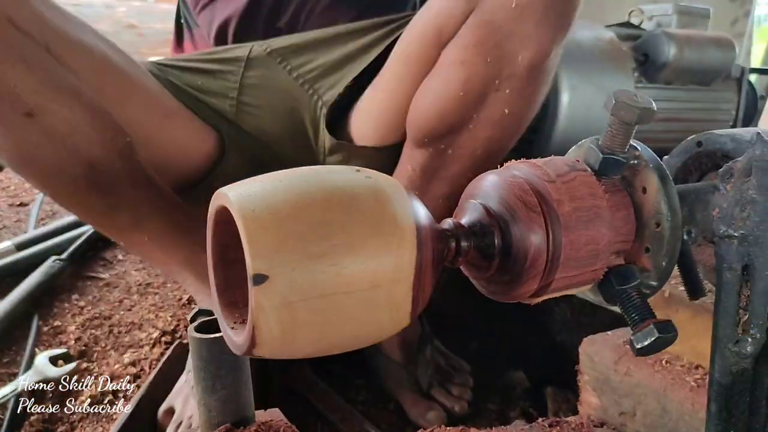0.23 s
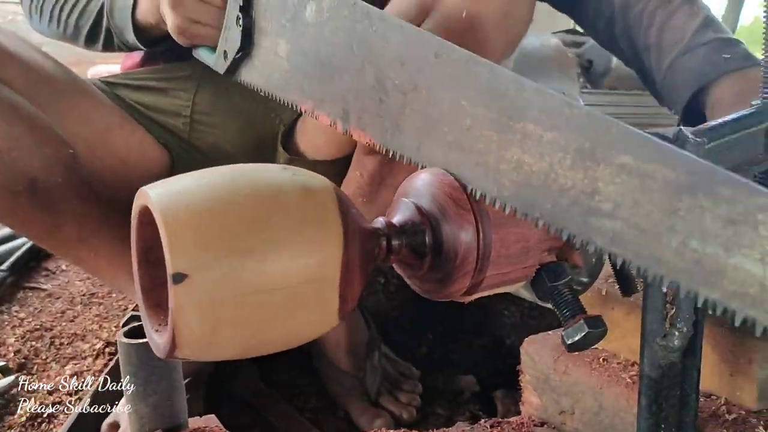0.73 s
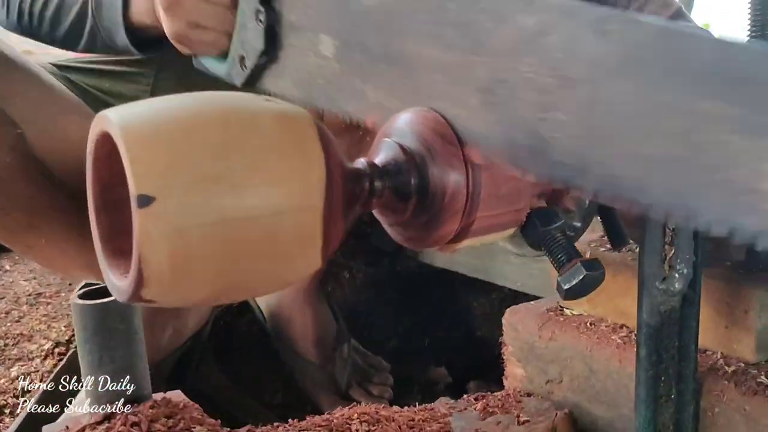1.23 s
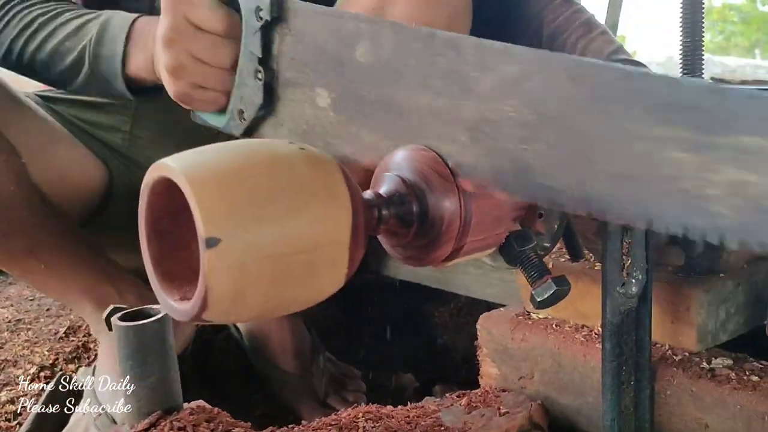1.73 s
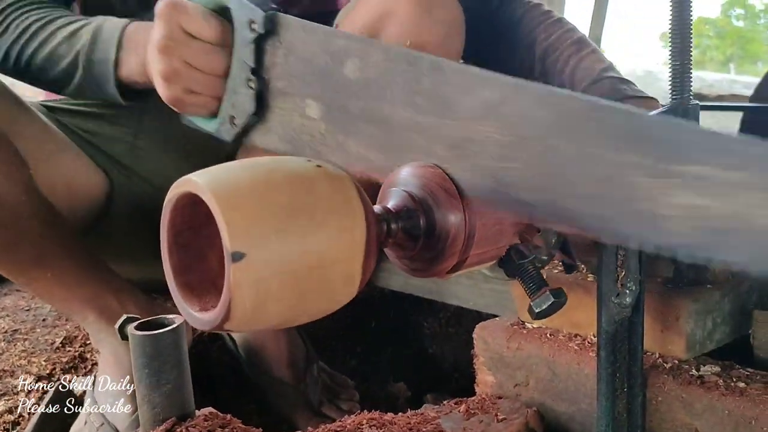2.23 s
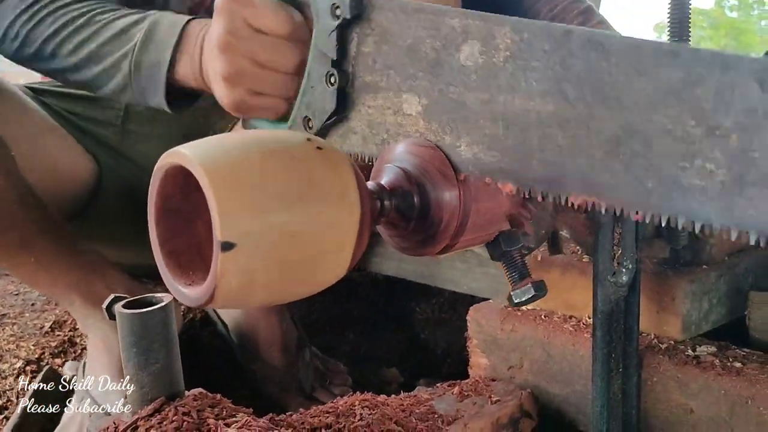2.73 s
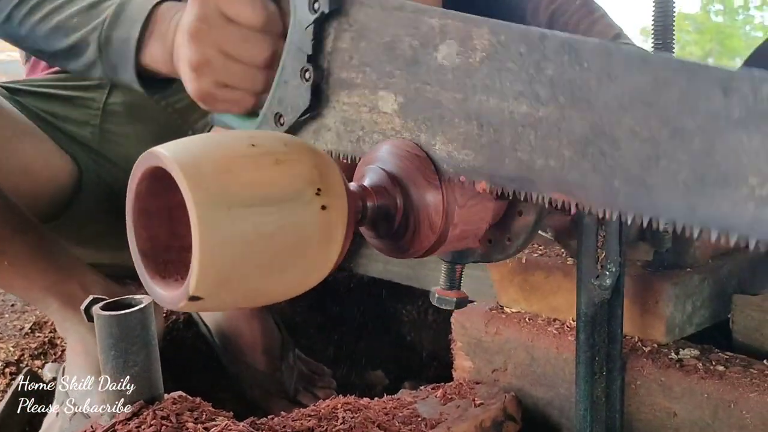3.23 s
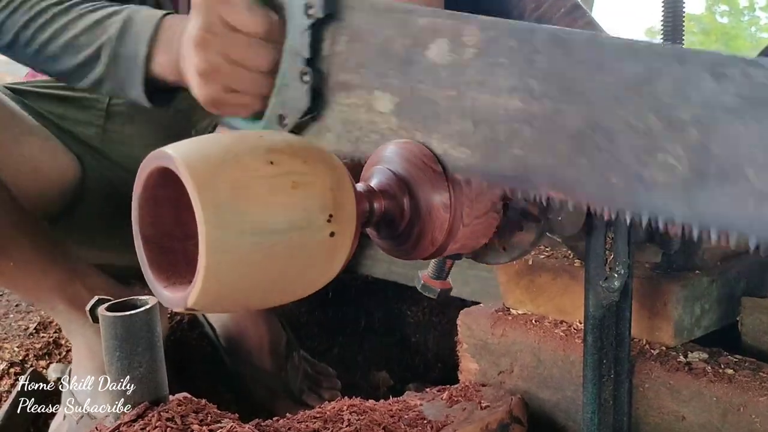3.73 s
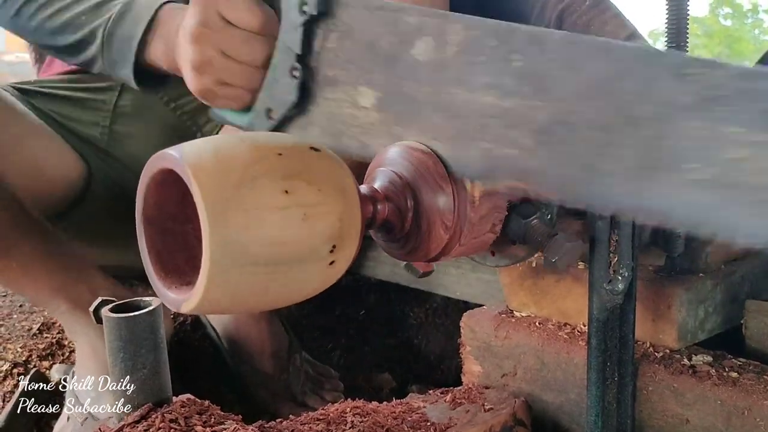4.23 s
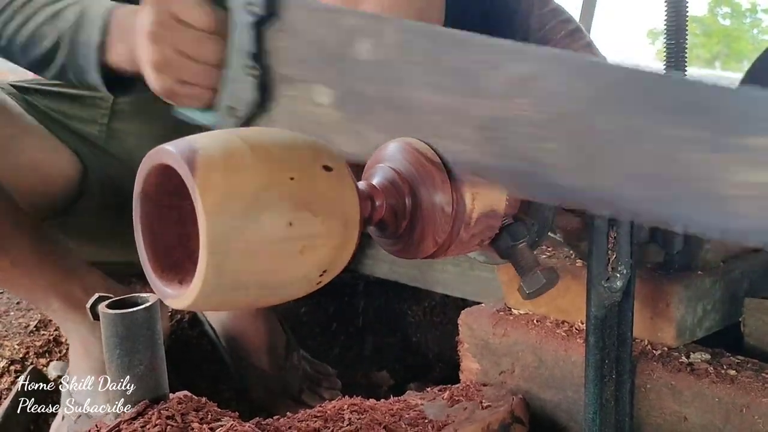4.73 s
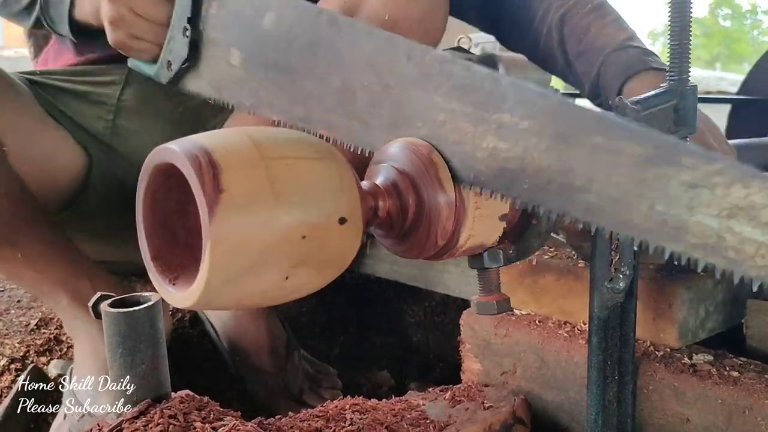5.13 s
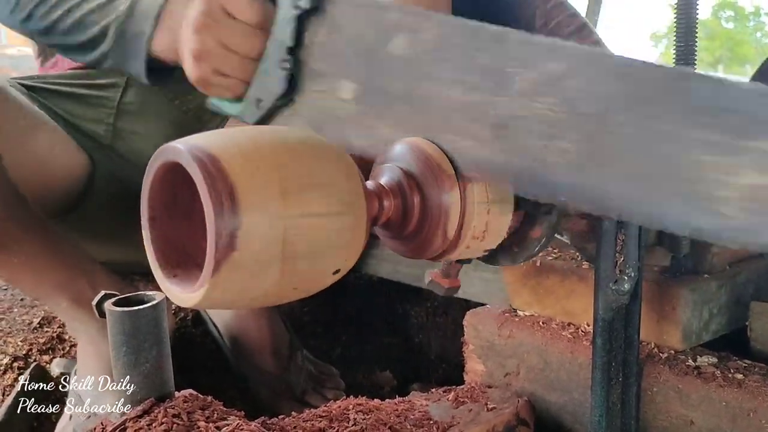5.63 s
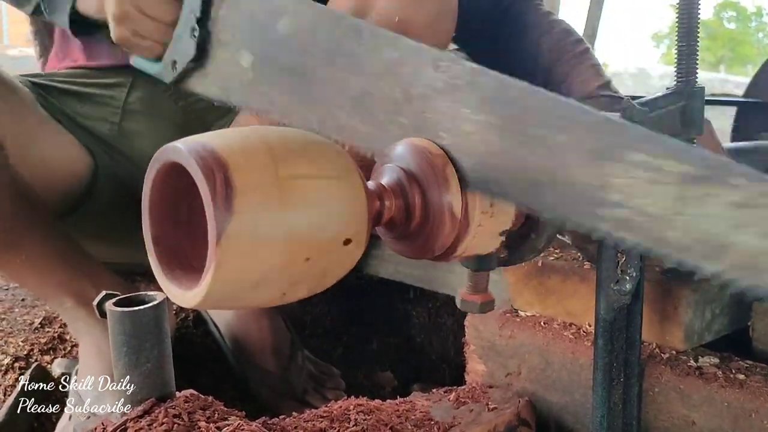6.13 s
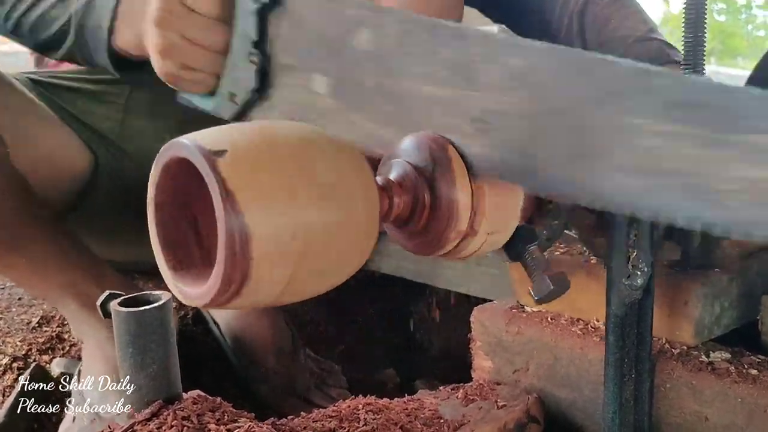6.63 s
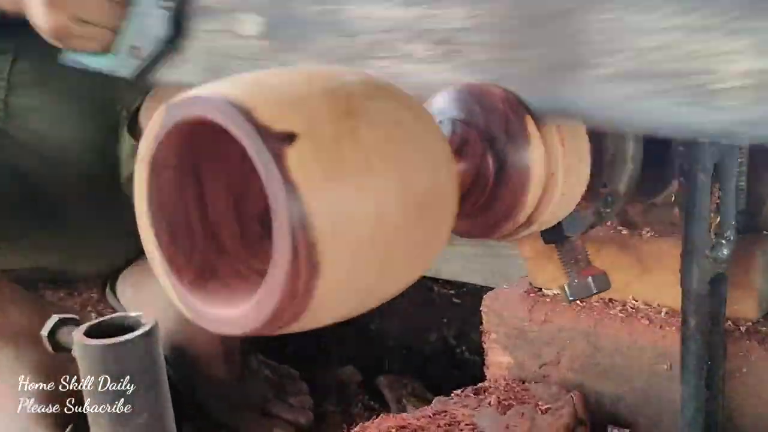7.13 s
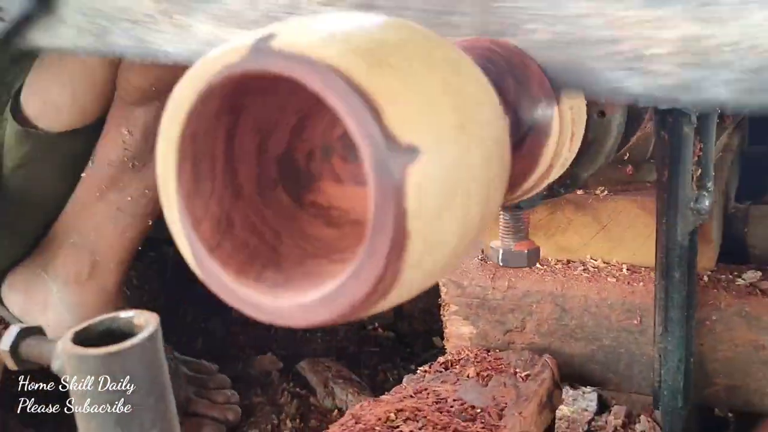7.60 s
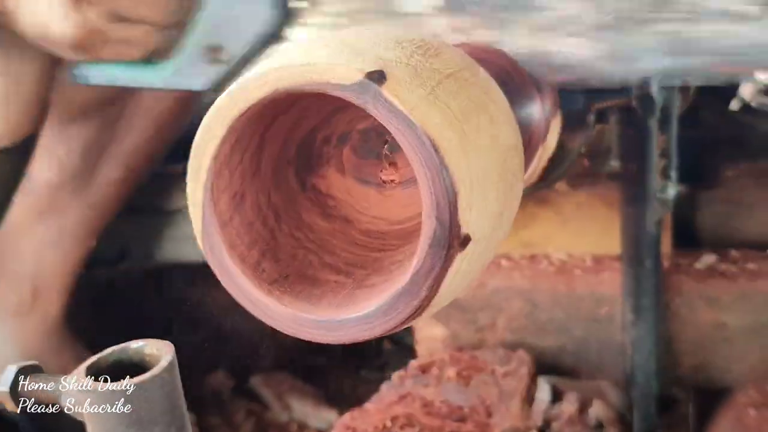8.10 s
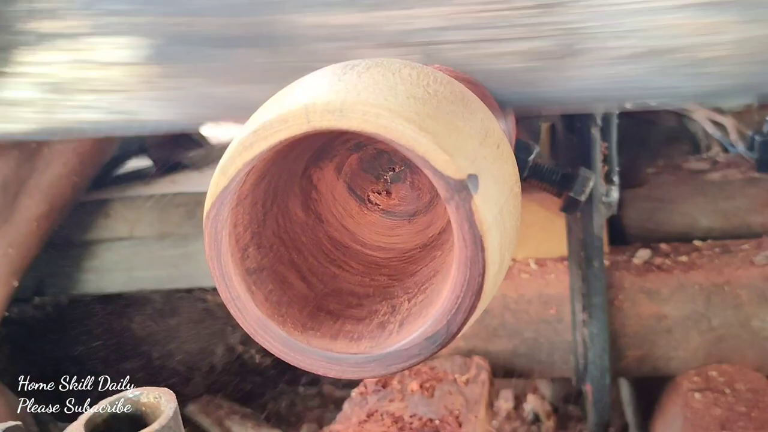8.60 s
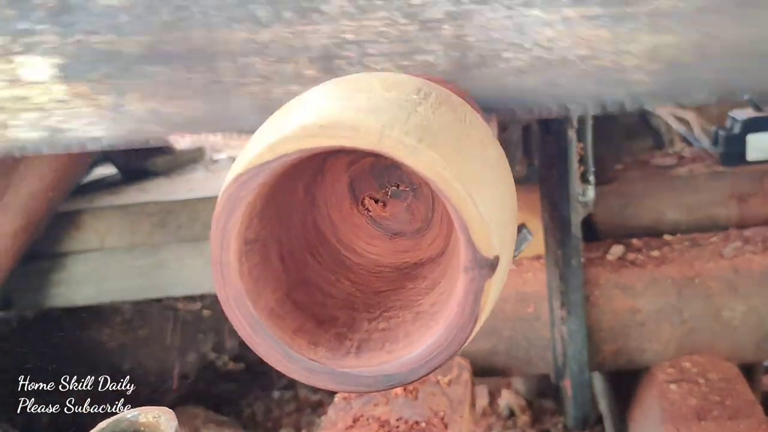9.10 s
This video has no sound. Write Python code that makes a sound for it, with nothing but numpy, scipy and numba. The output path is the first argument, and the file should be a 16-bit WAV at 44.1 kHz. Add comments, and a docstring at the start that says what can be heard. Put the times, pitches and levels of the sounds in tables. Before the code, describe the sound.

A quiet open shed with very faint air and a short, weak echo. From 0.2 s saw teeth barely scrape; by 0.7 s a hand saw rasps quickly back and forth, about eight strokes a second, gritty and bright with a hollow woody ring around 800-900 Hz. A short soft hoot near 1 kHz comes at 1.1 s. Blunt knocks fall at 2.0, 2.7, 3.3-3.4, 3.9 and 5.0 s, with brief rests near 2.8, 4.0, 5.1 and 6.3 s. Between 3.8 and 7 s tiny squeaks, mostly rising, chirp around 2-3 kHz. From 6.2 s the microphone moves closer and the rasp grows louder and changes colour. From 7 to 8.5 s low dust pops strike the left channel, which turns muffled. A strong knock lands at 7.45 s. Sawing halts at 8.75 s with a faint steel ring, then resumes for a few uneven strokes and a falling squeal at 9.3 s.

```python
"""Hand saw on a turned wooden cup

A hand saw cuts a turned wooden cup off its stub on a stopped lathe, in quick strokes with short rests, in an
open shed. Noise bursts of the teeth, shaped by speed and pressure, make the rasp and excite modes of cup and blade.
Stick-slip squeals are gliding tones; knocks, a blade ring and two hoots join them, with a faint echo and air.
Late on the phone moves in front of the cup and the rasp changes colour; sawdust pops against its left microphone
port and clogs it, a moving low-pass filter, so that side goes dull."""
import sys
import numpy as np
from scipy import signal
from scipy.fft import rfft, irfft
from scipy.io import wavfile
from scipy.ndimage import uniform_filter1d
from numba import njit

SR = 44100
rng = np.random.default_rng(int(sys.argv[2]) if len(sys.argv) > 2 else 0)


def waveform_to_disk(signal):
    """Save audio, clipped to [-1, 1], as 16-bit WAV at the path in sys.argv[1]."""
    frames = np.transpose(np.atleast_2d(signal))
    scaled = np.clip(frames, -1, 1) * 32767
    samples = np.round(scaled).astype(np.int16)
    wavfile.write(sys.argv[1], SR, samples)


N = 412776
TIME = np.arange(N) / SR

# the quiet shed, relative spectrum: frequency_hz, density_db (per Hz)
AIR_SPECTRUM = [(30, -16), (90, -15), (170, 0), (300, -12), (900, -9), (2000, -12), (8000, -18),
                (13000, -15), (15500, -54)]
# likeness of the two ports: frequency_hz, correlation (no unit)
PORT_LIKENESS = [(100, 1), (800, 0.9), (1500, 0.75), (3000, 0.12), (7000, 0.26), (13000, 0.083)]
# dust lowers and then damps the left port's resonance: time_s, resonance_hz, damping (no unit)
PORT_CLOGGING = [(5.9, 20000, 1.5), (6.45, 13000, 0.79), (6.6, 10600, .45), (6.9, 10050, 0.12),
                 (7.05, 7200, .62), (7.09, 6000, 8.1), (7.25, 6000, 5.5), (7.4, 6000, 13), (8.2, 6000, 22),
                 (8.48, 6000, 5.4), (8.7, 6000, 17)]
# loudest sawdust grains striking the left port: time_s, peak_db, pop_hz, tick_db (gain beside the swing's)
DUST_GRAINS = [(7.04, -5.5, 1140, -26), (7.0663, -11.5, 1070, -3), (7.1127, -6, 770, -28),
               (7.124, -9, 900, -26), (7.148, -4, 700, -21), (7.1694, -10, 720, -26),
               (7.2703, -4.5, 810, -34), (7.2885, -3, 844, -8), (7.5165, -11, 556, -24),
               (7.5412, -4, 664, -16), (7.582, -8, 635, -14), (7.6276, -17.5, 490, -20),
               (7.6473, -5.5, 487, -38), (7.6807, -5, 614, -23), (7.8646, -5.5, 543, -32),
               (7.8863, -6, 524, -23), (7.9383, -12.5, 510, -26), (7.9925, -5.5, 530, -21),
               (8.0388, -6, 594, -26), (8.0882, -9.5, 677, -28), (8.0948, -5, 780, -10),
               (8.1869, -5, 560, -20), (8.2007, -4, 770, -10.5), (8.2183, -8, 784, -8),
               (8.4251, -4.5, 1570, -30), (8.4753, -5.5, 1140, -26)]
# two short hoots: start_s, end_s, top_pitch_hz, level_db (rms at the fullest)
HOOT_NOTES = [(0.068, 0.124, 1000, -50.5), (1.076, 1.178, 986, -26.5)]
# stick-slip of the blade in the kerf, its free length changing:
# start_s, end_s, first_pitch_hz, last_pitch_hz, level_db (rms at the fullest)
SQUEAL_GLIDES = [(3.81, 3.878, 2210, 2490, -34), (4.623, 4.689, 1940, 2560, -31),
                 (4.865, 4.929, 1895, 2540, -27.5), (5, 5.049, 1613, 1630, -33),
                 (5.425, 5.467, 1920, 2160, -32), (5.638, 5.698, 1950, 2550, -31),
                 (5.854, 5.912, 1990, 2630, -28.5), (6.075, 6.103, 1980, 2280, -33),
                 (6.099, 6.132, 2760, 3310, -32), (6.915, 6.948, 2500, 2530, -30),
                 (7.02, 7.063, 2170, 2160, -29), (9.3, 9.352, 2870, 1630, -22)]
# the bare blade rings on when a stroke stops dead: frequency_hz, initial_level_db (rms), t60_s
BLADE_DECAYS = [(640, -44.5, 0.39), (800, -62, .5), (950, -59, 0.47), (1900, -40, 0.21), (2465, -57, .35),
                (2620, -57, 0.32)]
# the teeth catch and knock the wood, faintly when the blade is at rest: time_s, peak_db
TOOTH_KNOCKS = [(.944, -27), (1.965, -22), (2.734, -20.5), (2.878, -51), (3.301, -22), (3.442, -18),
                (3.886, -21), (4.022, -40), (4.055, -49), (5.018, -22.5), (6.286, -44), (6.316, -36),
                (7.445, -13.5), (9.145, -41)]
# modes of the cup and clamped stub, relative levels: frequency_hz, width_hz, push_db, pull_db
WOOD_MODES = [(438, 9.1, -7, -17.5), (774, 25, 10.5, -1), (863, 102, 1, -4.5), (914.4, 40, 7, 3.5),
              (1024, 28, -4, -6.5)]
# modes of the blade, relative levels: frequency_hz, width_hz, level_db
BLADE_MODES = [(1450, 91, -14), (1612, 26, 2), (2200, 210, -6), (2446, 77, 0.5), (2630, 40, 0),
               (3140, 300, -3), (3896, 150, 1), (6080, 51, -8)]
# tearing of the fibres, relative spectrum: frequency_hz, density_db (per Hz)
TEARING_SPECTRUM = [(40, -39.5), (90, -31.5), (140, -25), (210, -15), (290, -21), (450, -8.5), (600, -9.5),
                    (900, -6), (1150, 0), (1600, -0.5), (2500, -1.5), (3300, 0), (5500, -2.5), (7500, -9.5)]
# hiss of the tooth tips, carrying on above it: frequency_hz, density_db (per Hz)
HISS_SPECTRUM = [(9500, -11.5), (11500, -11), (13500, -2.5), (14500, -8.5), (15500, -10.5)]
# colour of the rasp with the phone in front of the cup: frequency_hz, gain_db
CLOSE_COLOUR = [(200, -1.5), (400, -0.5), (900, 2.5), (1350, 2.5), (2000, -1), (2550, 3.5), (3200, -3),
                (4000, -3.5), (6000, -2), (9000, -4.5)]
# colour of the rasp while the blade is slow: frequency_hz, gain_db
SLOW_COLOUR = [(250, 13), (900, 2.5), (4500, -1), (12000, -1.5)]
# the teeth dig in and the rasp swells: time_s, extra_db
TOOTH_DIGS = [(.512, 8), (0.66, 9), (0.879, 8.5), (1.068, 6.5), (1.962, 6), (2.392, 5), (2.738, 2),
              (3.188, 12), (3.285, 6), (3.366, 8.5), (3.588, 6.5), (3.947, 6.5), (4.542, 4), (4.627, 4),
              (5.565, 8), (5.648, 5), (5.78, 5), (5.872, 2), (6.229, 9), (6.575, 3), (7.347, 6),
              (7.474, 6.5), (7.924, 3.5), (8.152, 3), (8.38, 4), (8.968, 2.5), (9.093, 10), (9.234, 3)]
# saw strokes, the faintest being the blade stirring in the kerf at rest:
# start_s, length_s, direction (+1 push, -1 pull), rasp_db (relative drive),
# pressure_rise_db (over the stroke), ring_db (drive of the wood against that of the rasp)
SAW_STROKES = [(0.201, 0.069, 1, -67, -2, 5), (0.273, 0.053, -1, -63.5, -16, 1.5),
               (0.469, 0.11, 1, -48.5, -6, 1), (0.595, 0.11, -1, -45, -1, -7.5),
               (0.712, 0.12, 1, -32, 9, -7.5), (0.847, 0.12, -1, -36.5, 20, -8),
               (0.974, 0.11, 1, -30.0, 3.5, -5.5), (1.082, 0.15, -1, -36, 6, -0.5),
               (1.215, 0.15, 1, -34, 1, -4.5), (1.352, 0.13, -1, -33, 15.5, -5),
               (1.479, 0.15, 1, -35.5, 10, -4), (1.642, 0.11, -1, -34.5, 9, -8),
               (1.735, 0.12, 1, -32, 18, -6.5), (1.862, 0.12, -1, -33, -8, -6),
               (1.979, 0.11, 1, -29.5, 2, -5.5), (2.108, 0.13, -1, -33.5, -15.5, -9.5),
               (2.213, 0.11, 1, -28, 10, -7), (2.332, 0.13, -1, -34.5, 1.5, -3.5),
               (2.457, 0.11, 1, -27.5, 5.5, -7.5), (2.57, 0.11, -1, -31.0, 6, -5.5),
               (2.677, 0.112, 1, -28.5, 1.5, -7), (2.727, 0.25, 1, -62, -16, 1),
               (3.005, 0.064, 1, -59.5, 9, -4), (3.056, 0.16, -1, -36, -10.5, -2),
               (3.214, 0.13, 1, -30, -5, -7), (3.335, 0.13, -1, -32.5, -2, -0.5),
               (3.45, 0.1, 1, -26.0, -2, -5), (3.56, 0.13, -1, -32.5, -8.5, -2.5),
               (3.666, 0.1, 1, -25, 15, -5.5), (3.778, 0.099, -1, -27.0, 6, -6),
               (3.862, 0.13, 1, -29.5, -2.5, -3), (3.965, 0.18, 1, -61.5, -3, 0),
               (4.104, 0.14, -1, -31.0, 5.5, -6), (4.237, 0.12, 1, -27.0, 7, -7.5),
               (4.369, 0.116, -1, -28, -6.5, -7.5), (4.464, 0.13, 1, -27.5, -3, -4.5),
               (4.593, 0.12, -1, -28.0, 2.5, -6.5), (4.701, 0.12, 1, -26.0, 13, -3.5),
               (4.83, 0.12, -1, -28.5, 1, -5), (4.949, 0.1, 1, -26, -4.5, -5),
               (5.008, 0.22, 1, -67.5, -6, 4), (5.152, 0.13, -1, -31, 7, -1.5),
               (5.263, 0.12, 1, -26, 19.5, -7), (5.386, 0.11, -1, -29, 7, -6),
               (5.493, 0.13, 1, -28.5, -3.5, -4), (5.621, 0.11, -1, -30, -4, -3),
               (5.709, 0.13, 1, -27, 0, -5.5), (5.834, 0.098, -1, -26.5, -3, -10.5),
               (5.919, 0.13, 1, -25.5, -6, -9), (6.042, 0.11, -1, -26.5, -10.5, -9),
               (6.11, 0.16, 1, -32.0, -5.5, -4), (6.244, 0.14, 1, -51, 0, -7),
               (6.379, 0.13, -1, -29, 3, -6.5), (6.503, 0.13, 1, -26.0, -0.5, -6),
               (6.635, 0.099, -1, -27.5, -7.5, -7), (6.729, 0.11, 1, -25.5, 12, -5.5),
               (6.85, 0.12, -1, -25.0, 2.5, -5.5), (6.955, 0.134, 1, -25, 1, -2),
               (7.08, 0.105, -1, -23.5, -3, -8.5), (7.178, 0.11, 1, -22, 0, -5.5),
               (7.291, 0.12, -1, -26.0, 10, -3), (7.404, 0.119, 1, -25.5, -4, -3),
               (7.637, 0.11, -1, -26, 12, -7.5), (7.752, 0.12, 1, -23, 8, -2.5),
               (7.869, 0.11, -1, -24.5, 8.5, -6.5), (7.964, 0.12, 1, -24, 31, -4),
               (8.087, 0.12, -1, -25, 1, -7), (8.202, 0.11, 1, -20.5, 2, -5),
               (8.312, 0.12, -1, -25.5, -5, -6.5), (8.428, 0.11, 1, -22.5, -5, -5),
               (8.542, 0.12, -1, -27, -5, -6.5), (8.665, 0.1, 1, -20.5, -2, -8.5),
               (8.727, 0.2, 1, -60, -22, 6), (8.899, 0.15, -1, -29.5, 3, -8.5),
               (9.035, 0.15, 1, -45, -18, -6), (9.173, 0.091, -1, -36, 26, 1), (9.263, 0.11, 1, -20, 2, -8)]

TOP_HZ = 15700  # upper limit of the phone
MOVE_S = (6.2, 7.07)  # start and end of the phone's move in front of the cup
BLADE_STOP_S = 8.745  # when the blade halts
# finer dust, falling at random: time span, middle of the peak levels, middle of the pitches
FINE_DUST_S, FINE_DUST_DB, FINE_DUST_HZ = (7.69, 8.04), -20.5, 490
# loudness follows blade speed to a power: a push bites in the middle, a pull drags all the way
PUSH_POWER, PULL_POWER = 1.84, 1
RING_POWER = 0.7  # share of that power which the wood ring follows
CREEP = 0.036  # added to the speed law, so that some drive is left at the turn of a stroke
USUAL_DB, FAINT_DB = -29, -44  # drive of an ordinary stroke; below the second, tilt changes no further
PUSH_BASS_DB, PULL_BASS_DB, TREBLE_DB = -1, -6.5, 2  # spectral tilt at the usual force
# dB lost per dB of force: harder strokes gain less in the bass, and pulls also in the treble
BASS_LOSS, PUSH_TREBLE_LOSS, PULL_TREBLE_LOSS = 0.61, 0.04, 0.23
DIG_S = 0.015  # half-width of a dig, where its extra dB has fallen to 1/e
RING_RISE_DB, RING_DIG = 2.5, 0.59  # build-up of the wood's drive over a stroke; share of a dig's dB reaching it


def undb(db):
    """Decibels are a logarithmic measure of amplitude: 20 dB is a factor of ten."""
    return 10 ** (np.asarray(db) / 20)


def add(track, sound, start):
    """Superposition: sounds add linearly, this one from its start time in seconds."""
    i = max(int(start * SR), 0)
    track[..., i:i + sound.shape[-1]] += sound[..., :N - i]


def on_log(hz, points):
    """Spectra are interpolated on a logarithmic frequency axis."""
    f, value = np.transpose(points)
    return np.interp(np.log(hz + 1), np.log(f), value)


def resonance(hz, centre, width):
    """A damped mode responds as a second-order band-pass, with gain 1 at its centre."""
    return 1j * hz * width / (centre ** 2 - hz ** 2 + 1j * hz * width)


def unit_power(response, band):
    """Power normalization: white noise leaves the response with power 1 inside the band."""
    return response / np.sqrt(np.mean(np.abs(response * band) ** 2))


def ports(pair, hz):
    """Spatial coherence: unrelated spectra become left and right, alike in the bass, left one sample late."""
    alike = np.clip(on_log(hz, PORT_LIKENESS), -1, 1)
    mid = pair[0] * np.sqrt((1 + alike) / 2)
    side = pair[1] * np.sqrt((1 - alike) / 2)
    one_sample_late = np.exp(-2j * np.pi * hz / SR)
    return np.array([(mid + side) * one_sample_late, mid - side])


def air(db=-73):
    """Stationary noise: a faint outdoor background with a fixed spectrum."""
    hz = np.fft.rfftfreq(N, 1 / SR)
    colour = unit_power(undb(on_log(hz, AIR_SPECTRUM)), hz > 0)
    noise = rfft(rng.standard_normal((2, N)))
    return undb(db) * irfft(ports(noise * colour, hz), N)


def shed(sound, t60=0.27, wet_db=-21):
    """Diffuse reflection: ground, machine and roof return a short echo, here exponentially decaying noise."""
    t = TIME[:SR // 2]
    echo = rng.standard_normal((2, len(t))) * undb(-60 * t / t60) * (t > .004)
    echo /= np.sqrt(np.sum(echo ** 2, axis=1, keepdims=True))
    return undb(wet_db) * signal.fftconvolve(sound, echo, axes=1)[:, :N]


@njit
def low_pass(x, hz, damping):
    """Acoustic low-pass: a clogged port is a two-pole resonator whose frequency and damping move."""
    y, band, low = np.empty(len(x)), 0., 0.
    for i in range(len(x)):
        g = np.tan(np.pi * hz[i] / SR)
        v = (band + g * (x[i] - low)) / (1 + g * (g + damping[i]))
        y[i] = low + g * v
        band, low = 2 * v - band, 2 * y[i] - low
    return y


def clogged_port(sound):
    """Moving resonance: frequency and log damping are interpolated between the stages of clogging."""
    s, port_hz, damping = np.transpose(PORT_CLOGGING)
    port_hz = np.minimum(np.interp(TIME, s, port_hz), .47 * SR)  # kept below the Nyquist limit
    damping = np.exp(np.interp(TIME, s, np.log(damping)))
    return low_pass(sound, port_hz, damping)


def dust_pops(damping=1.55, size=2048, count=9):
    """Impulse response: a grain gives the port's air one heavily damped swing, a faint thud and a tick."""
    out, hz = np.zeros(N), np.fft.rfftfreq(size, 1 / SR)
    tick = resonance(hz, 2000, 1530) ** 2 / (1 + 1j * hz / 3500)
    thud = undb(-31) * resonance(hz, 45, 90)
    grains = list(DUST_GRAINS)
    for when, weight, pitch in rng.random((count, 3)):
        s = np.interp(when, [0, 1], FINE_DUST_S)
        peak_db = FINE_DUST_DB + 8 * (weight - .5)
        grains.append((s, peak_db, FINE_DUST_HZ * (1 + .4 * (pitch - .5)), -27))
    for s, peak_db, pop_hz, tick_db in grains:
        swing = resonance(hz, pop_hz, damping * pop_hz) ** 2 / (1 + 1j * hz / (1.8 * pop_hz)) ** 2
        pop = -irfft(swing + undb(tick_db) * tick - thud)
        add(out, undb(peak_db) * pop / pop.max(), s - np.argmax(pop) / SR)  # the peak falls at s
    return out


def tone(pitch_hz, db, waver, overtone_db):
    """Frequency modulation: a swelling and fading tone with an unsteady pitch and a weak octave."""
    n = len(pitch_hz)
    wobble = uniform_filter1d(rng.standard_normal(n), size=100)
    phase = 2 * np.pi * np.cumsum(pitch_hz * (1 + waver * wobble / wobble.std())) / SR
    swell = np.hanning(n) ** .8
    return np.sqrt(2) * undb(db) * swell * (np.sin(phase) + undb(overtone_db) * np.sin(2 * phase))


def hoots():
    """Near-sinusoidal tone: nearly pure notes whose pitch arches."""
    out = np.zeros((2, N))
    for start, end, top_hz, db in HOOT_NOTES:
        u = np.linspace(-1, 1, int((end - start) * SR))
        add(out, tone(top_hz * (1 - .16 * u ** 2), db, waver=.008, overtone_db=-23), start)
    return out


def squeals():
    """Stick-slip oscillation: slightly rough tones of the blade, whose glide slows towards its end."""
    out = np.zeros((2, N))
    for start, end, first_hz, last_hz, db in SQUEAL_GLIDES:
        glide = np.sin(np.linspace(0, np.pi / 2, int((end - start) * SR))) ** 1.4
        pitch_hz = first_hz + (last_hz - first_hz) * glide
        add(out, tone(pitch_hz, db, waver=.016, overtone_db=-18), start)
    return out


def blade_ring():
    """Free vibration: the halted blade dies away exponentially in its own modes."""
    out, t = np.zeros((2, N)), TIME[:SR]
    ring = sum(np.sqrt(2) * undb(db - 60 * t / t60) * np.sin(2 * np.pi * hz * t)
               for hz, db, t60 in BLADE_DECAYS)
    add(out, ring, BLADE_STOP_S)
    return out


def wood_response(hz, direction):
    """Modal superposition: push and pull load the cup differently; each contact detunes it a little."""
    detune = 1 + 0.018 * rng.standard_normal(len(WOOD_MODES))
    modes = 0
    for k, (f, width, push_db, pull_db) in enumerate(WOOD_MODES):
        gain = undb(push_db if direction > 0 else pull_db)
        modes = modes + (-1) ** k * gain * resonance(hz, f * detune[k], width)  # neighbours in opposite phase
    return unit_power(modes * resonance(hz, 810, 1500), hz > 0)


def knocks(size=8192):
    """Impulsive excitation: a catching tooth gives the wood one blunt blow."""
    out, hz = np.zeros((2, N)), np.fft.rfftfreq(size, 1 / SR)
    for s, peak_db in TOOTH_KNOCKS:
        knock = irfft(wood_response(hz, 1) + 5 * resonance(hz, 935, 280) ** 2)
        add(out, undb(peak_db) * knock / np.abs(knock).max(), s)
    return out


def ripple(hz, spacing_hz, depth_db):
    """Plate modes give random spectral peaks and dips, which change with the point of contact."""
    knots = np.arange(0, SR / 2 + spacing_hz, spacing_hz)
    gain = undb(depth_db * np.interp(hz, knots, rng.standard_normal(len(knots))))
    return gain / np.sqrt(np.mean(gain ** 2))


def digging(t):
    """Transient loading: extra dB of the rasp at the given times, where the teeth dig in."""
    return sum(extra_db * np.exp(-((t - s) / DIG_S) ** 2) for s, extra_db in TOOTH_DIGS)


def teeth(speed, tooth_hz, bite, uneven_db, snap_db):
    """Periodic fracture: each passing tooth modulates the noise of torn fibres; rms 1, two unrelated rows."""
    n = len(speed)
    passed = np.cumsum(tooth_hz * (.3 + .7 * speed)) / SR + rng.random()
    tooth = passed.astype(int)
    tooth_gain = undb(uneven_db * rng.standard_normal(tooth[-1] + 1))[tooth]
    burst = (.5 + np.exp(-(passed % 1) / bite)) * tooth_gain  # bite in tooth spacings
    snap = np.minimum(rng.exponential(size=n // 8 + 1), 7)
    fibres = undb(snap_db * snap).repeat(8)[:n]  # each gain is held for 8 samples
    force = burst * fibres * rng.standard_normal((2, n))
    return force / np.sqrt(np.mean(force ** 2))


def rasp_colour(hz, closeness):
    """Transmission through a plate: the rasp is heard through the blade, whose modes stand out of it."""
    modes = sum(np.abs(undb(db + 2.5) * resonance(hz, f, width)) ** 2 for f, width, db in BLADE_MODES)
    steel = np.sqrt(1 + modes)
    spectrum_db = on_log(hz, TEARING_SPECTRUM + HISS_SPECTRUM) + closeness * on_log(hz, CLOSE_COLOUR)
    return unit_power(undb(spectrum_db) * steel, (hz > 1200) & (hz < 6000))


def stroke(start, length, direction, db, rise_db, ring_db, size=16384):
    """Forced vibration: the blade speeds up and stops again, its force rasping and ringing the wood."""
    u = np.linspace(0, 1, int(length * SR))
    speed = np.abs(np.sin(np.pi * u))  # share of the top speed
    hz = np.fft.rfftfreq(size, 1 / SR)
    if direction > 0:
        power, bass_db, treble_loss = PUSH_POWER, PUSH_BASS_DB, PUSH_TREBLE_LOSS
    else:
        power, bass_db, treble_loss = PULL_POWER, PULL_BASS_DB, PULL_TREBLE_LOSS
    pressure = undb(db + rise_db * (u - .5))
    dig_db = digging(start + u * length)
    tooth_hz = 260 * (1 + .12 * rng.standard_normal())  # at top speed
    force = pressure * teeth(speed, tooth_hz, bite=1.0, uneven_db=1.5, snap_db=-0.7)
    tearing = force * undb(dig_db) * (CREEP + speed ** power)
    shaking_db = ring_db + RING_RISE_DB * (u - .5) + RING_DIG * dig_db
    shaking = force * undb(shaking_db) * (CREEP + speed ** (power * RING_POWER))

    # the contact slides along the blade: one fine pattern of peaks gives way to another with speed
    depth_db = on_log(hz, [(2500, 4.65), (9000, 5.7)])
    slow = rfft(tearing * (1 - speed ** 2), size) * ripple(hz, spacing_hz=119.75, depth_db=depth_db)
    fast = rfft(tearing * speed ** 2, size) * ripple(hz, spacing_hz=119.75, depth_db=depth_db)
    rasp = slow * undb(on_log(hz, SLOW_COLOUR)) + fast  # slow teeth sound duller

    colour = rasp_colour(hz, closeness=np.interp(start, MOVE_S, [0, 1]))
    effort_db = max(db, FAINT_DB) - USUAL_DB
    bass_tilt_db = bass_db - BASS_LOSS * effort_db
    treble_tilt_db = TREBLE_DB - treble_loss * effort_db
    tilt_db = on_log(hz, [(280, bass_tilt_db), (700, 0), (4500, 0.032), (9000, treble_tilt_db)])
    wood = rfft(shaking, size) * wood_response(hz, direction) * undb(0.5)
    return irfft(ports(rasp * colour * undb(tilt_db + 1.5) + wood, hz))


def saw():
    """Superposition of strokes: each sounds from its own start, and its ring may overlap the next."""
    out = np.zeros((2, N))
    for row in SAW_STROKES:
        add(out, stroke(*row), row[0])
    return out


def scene():
    """Linear mixing: direct sound, echo and air reach two ports; the left one fills with dust."""
    near = saw() + knocks() + squeals() + blade_ring() + hoots()
    left, right = near + shed(near) + air()
    return np.array([clogged_port(left) + dust_pops(), right])


def record(dry):
    """Band limitation: the phone cuts the top with a steep elliptic low-pass."""
    return signal.sosfilt(signal.ellip(10, .2, 80, TOP_HZ, fs=SR, output="sos"), dry)


dry = scene()
out = record(dry)
waveform_to_disk(out)
```